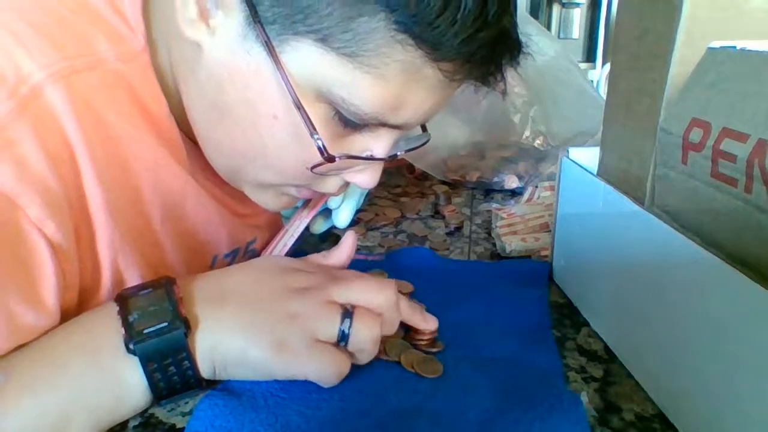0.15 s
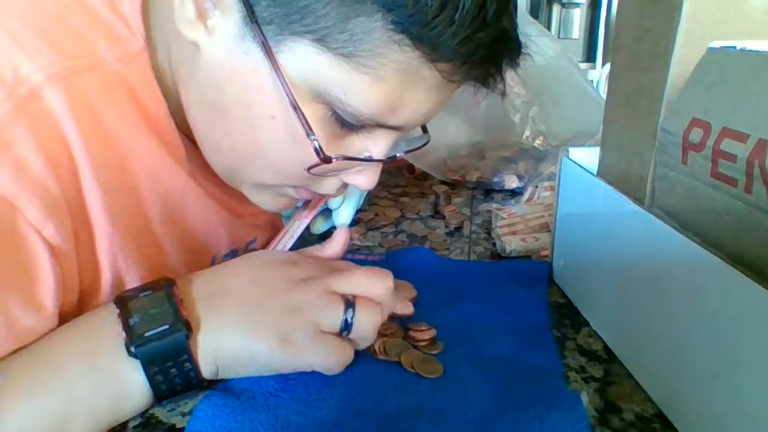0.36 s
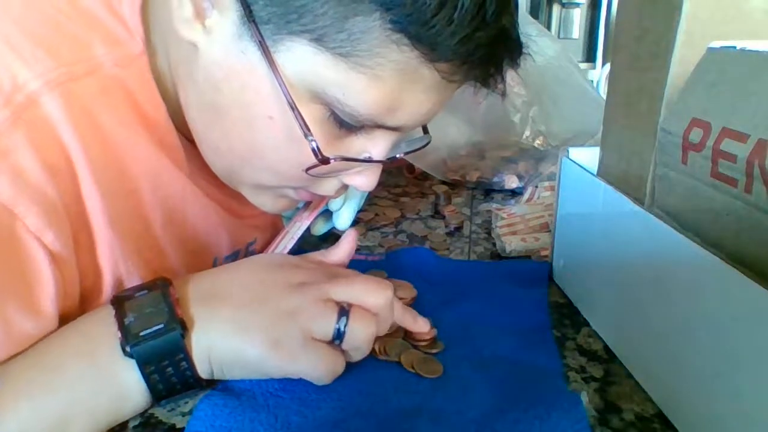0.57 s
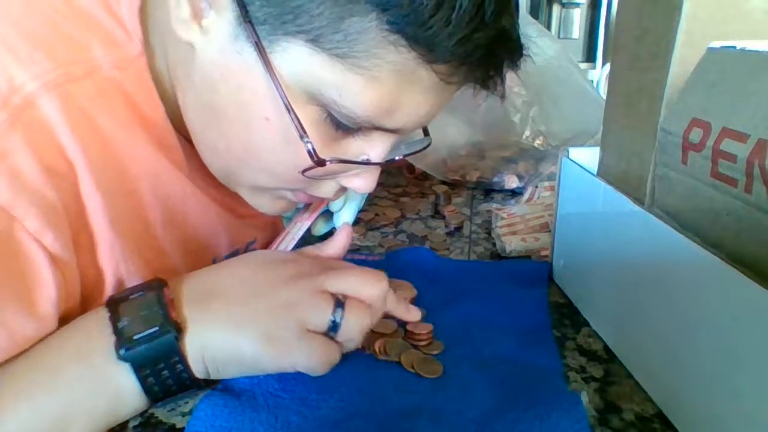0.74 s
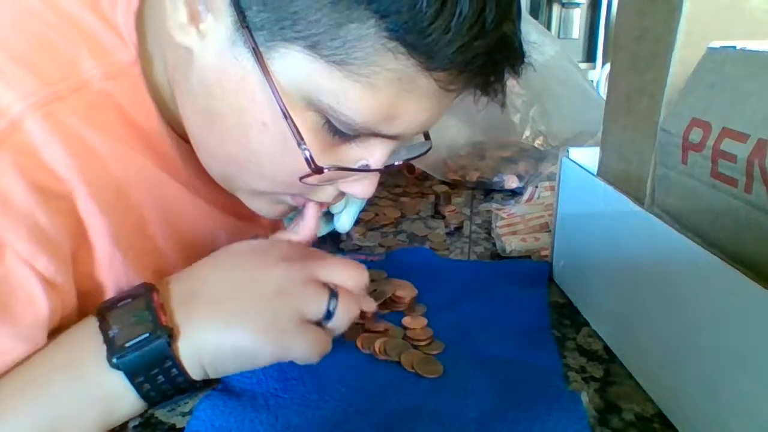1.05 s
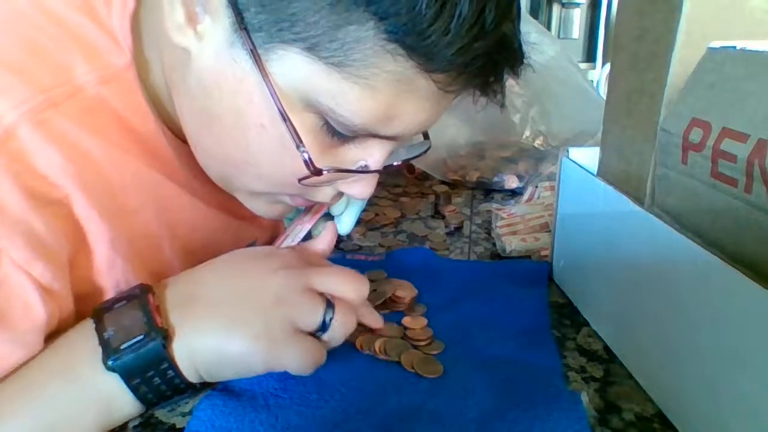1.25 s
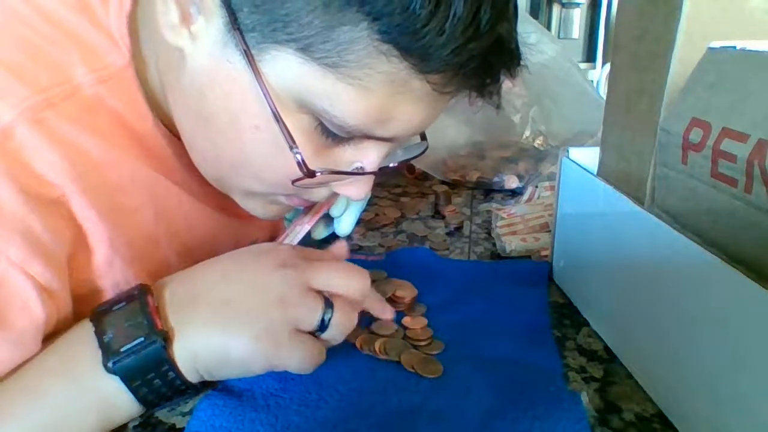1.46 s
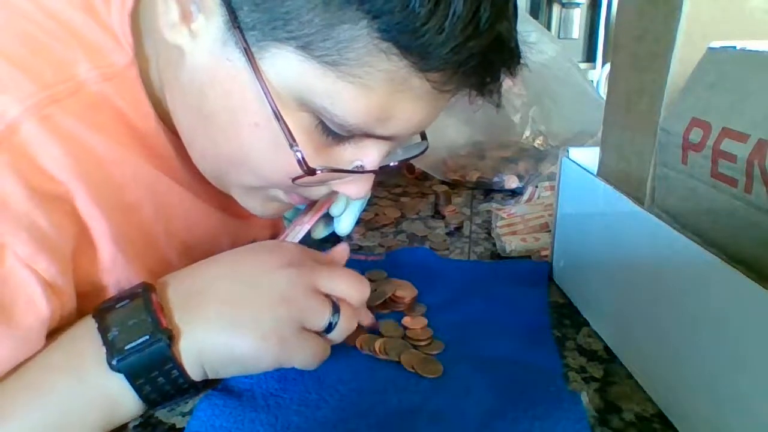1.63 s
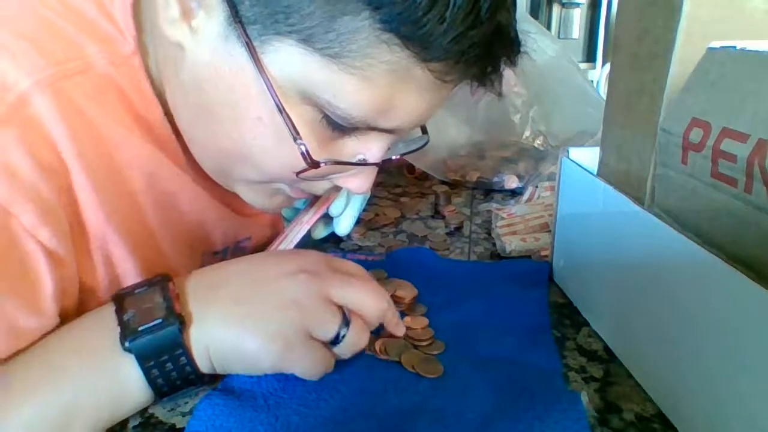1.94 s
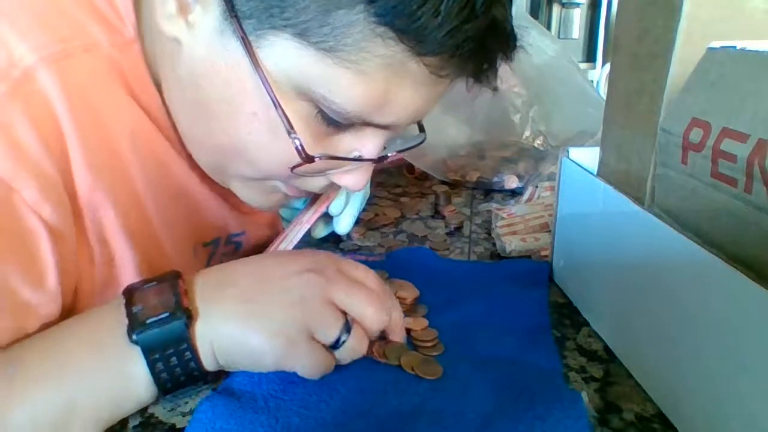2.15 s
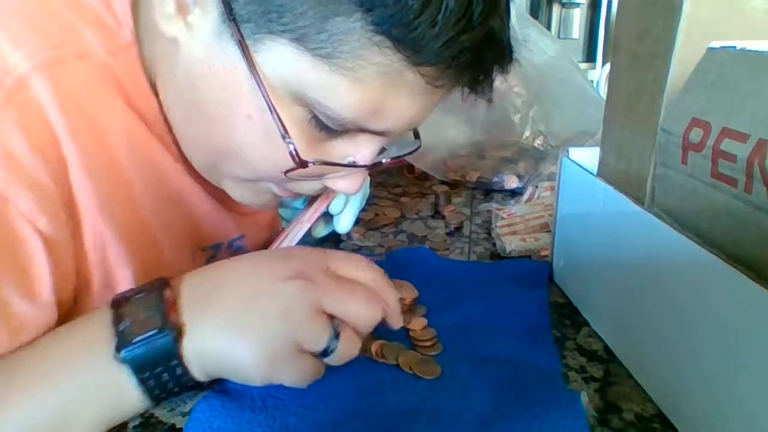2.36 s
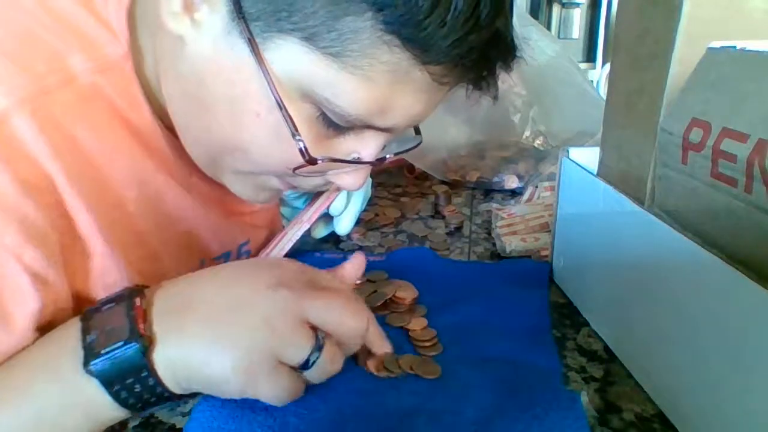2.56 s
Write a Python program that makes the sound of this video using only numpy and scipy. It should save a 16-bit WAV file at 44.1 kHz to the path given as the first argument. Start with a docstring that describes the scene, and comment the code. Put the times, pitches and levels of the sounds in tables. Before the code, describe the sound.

Coins scrape and click together on a soft cloth, then a loud metallic clatter crashes across the room.

```python
"""Coins are pushed about on a cloth close to the microphone: their rims scrape and click together.
The scrapes and clicks are short bursts of noise, filtered to ring like metal; the cloth is soft, patchy noise.
Farther off in the room things are shifted, then clatter down loudly, late on with a metallic clang.
These are noise washes and sine notes that die away as the room rings on, with dull bumps below.
Under it all lie still air and a faint motor hum, and the recorder's limiter flattens the crashes."""
import sys
import numpy as np
from scipy import signal
from scipy.fft import rfft, irfft
from scipy.io import wavfile

SR = 44100
rng = np.random.default_rng(int(sys.argv[2]) if len(sys.argv) > 2 else 0)


def wav_record(signal):
    """Record a signal, one row per channel, as 16-bit PCM in the file named by sys.argv[1]."""
    frames = np.transpose(np.atleast_2d(signal))
    bounded = np.clip(frames, -1, 1)
    # unit amplitude maps onto the largest positive 16-bit level
    quanta = np.round(bounded * 32767).astype(np.int16)
    wavfile.write(sys.argv[1], SR, quanta)


N = 119070
T = np.arange(N) / SR
GRIT_DB, BURST_GRIT_DB = 2.5, 1.5  # unevenness of light contacts, and of heavy clatter


def undb(db):
    """Turn decibels into a plain multiplier."""
    return 10 ** (np.asarray(db) / 20)


def unit(x):
    """Scale to an rms (average strength) of 1."""
    return x / np.sqrt(np.mean(x ** 2))


def add(out, at, x):
    """Mix x into out from a given time in seconds, cutting off what falls outside."""
    i = int(round(at * SR))
    lo, hi = max(i, 0), min(i + len(x), N)
    out[lo:hi] += x[lo - i:hi - i]


def axes(size):
    """Times in seconds and frequencies in Hz of a buffer."""
    return np.arange(size) / SR, np.maximum(np.fft.rfftfreq(size, 1 / SR), 1)


def colour(f, points):
    """Gain at each frequency, drawn in straight lines through (Hz, dB) points on a log pitch axis."""
    hz, db = np.array(points).T
    return undb(np.interp(np.log(f), np.log(hz), db))


def ring(f, hz, width, db):
    """Gain of a resonance standing db above its surroundings."""
    return np.sqrt(1 + (undb(db) ** 2 - 1) / (1 + (2 * (f - hz) / width) ** 2))


def shaped(x, gain):
    """Filter with the given gains, ringing only after each impulse and keeping the power of white noise."""
    cepstrum = irfft(np.log(unit(gain) + 1e-6), len(x))
    # folding the second half onto the first makes the filter respond only forward in time
    cepstrum[1:len(x) // 2] *= 2
    cepstrum[len(x) // 2 + 1:] = 0
    return irfft(rfft(x) * np.exp(rfft(cepstrum)), len(x))


def grit(size, spread_db):
    """Noise like dense tiny impacts, its strength jumping every 16 samples."""
    strength_db = spread_db * np.repeat(rng.standard_normal(size), 16)[:size]
    return unit(rng.standard_normal(size) * undb(strength_db))


def swell(t, rise, hold, t60):
    """Rise, hold, then die away by 60 dB in t60 seconds."""
    fade_db = -60 * np.maximum(t - rise - hold, 0) / t60
    return np.minimum(t / max(rise, 1e-4), 1) * undb(fade_db)


def walk(size, step):
    """Random wandering with a spread near 1, heading for a new value every step samples."""
    knots = rng.standard_normal(int(size / step) + 2)
    return np.interp(np.arange(size) / step, np.arange(len(knots)), knots) * 1.2


# colour of the still room air: pitch_hz, relative_level_db
AIR_COLOUR = [(30, -28), (55, -3), (130, 10), (380, 0.5), (560, -17.5), (1000, -2), (2000, -22),
              (3500, -11), (5500, -6.5), (8600, -47)]
# colour of the motor's throb: pitch_hz, relative_level_db
THROB_COLOUR = [(29, -33.5), (58, 7.5), (87, 7), (116, 4), (145, 4), (174, -13), (230, -16.5), (400, -35)]
AIR_DB = -81.5
MOTOR_HZ, MOTOR_DB, MOTOR_ROUGH_DB = 29.05, -72, 1  # turns per second, level, unevenness of the turns
WHINE_HZ, WHINE_DB, WHINE_WAVER_DB = 780, -80.5, 3


def background():
    """Still room air, and a small motor that throbs once a turn under a wavering whine."""
    _, f = axes(size=N)
    air = undb(AIR_DB) * shaped(rng.standard_normal(N), colour(f, AIR_COLOUR))
    # one click of slightly uneven strength per turn
    turns = np.diff(np.floor(MOTOR_HZ * T), prepend=0) * undb(MOTOR_ROUGH_DB * rng.standard_normal(N))
    throb = undb(MOTOR_DB) * unit(shaped(turns - turns.mean(), colour(f, THROB_COLOUR)))
    whine_level = undb(WHINE_DB + WHINE_WAVER_DB * walk(N, SR / 40))
    whine = whine_level * np.sqrt(2) * np.sin(2 * np.pi * WHINE_HZ * T)
    return throb + whine + air


# dull bumps on the table: start_s, level_db, pitch_hz, decay_s
BUMPS = [(.022, -56.5, 343, 0.024), (0.313, -56.5, 134, .025), (.624, -59.5, 797, 0.018),
         (0.757, -51, 139, 0.0076), (1.446, -50.5, 157, .012), (1.496, -48, 126, .025),
         (1.714, -52, 83, 0.038), (1.757, -52, 580, .02), (1.832, -60.5, 90.6, .08),
         (1.941, -29.5, 111.4, .028), (1.988, -39.5, 84.3, .07), (2.163, -41.5, 118.6, .03),
         (2.3, -49, 81, .08), (2.387, -38, 109, .02), (2.403, -27.5, 123, .025), (2.44, -34, 448.8, 0.05),
         (2.475, -29, 339, 0.0093), (2.582, -48, 188, 0.017), (2.667, -44.5, 263, 0.036),
         (2.632, -48.5, 100, .04)]
THUMP_RISE_S, THUMP_NOISE = .004, 0.63  # noise strength beside a note of peak 1


def thumps():
    """Each bump sets off a damped note with rumble around it."""
    out = np.zeros(N)
    t, f = axes(size=16384)
    for at, db, hz, decay in BUMPS:
        rumble = shaped(rng.standard_normal(len(t)), 1 / (1 + np.log2(f / hz) ** 4) ** 2)
        bump = np.sin(2 * np.pi * hz * t) + THUMP_NOISE * rumble
        envelope = np.minimum(t / THUMP_RISE_S, 1) * np.exp(-t / decay)
        add(out, at, undb(db) * bump * envelope)
    return out


# lighter clinks across the room: start_s, level_db, rise_s, hold_s, ring_hz, ring_width_hz, ring_db
CLINK_EVENTS = [(1.431, -47, 0.0025, 0.05, 3600, 350, 9), (1.485, -54.5, .005, 0.031, 3500, 500, 9),
                (2.657, -54, .003, 0.011, 5045, 200, 23)]
# colour of the clinks: pitch_hz, relative_level_db
CLINK_COLOUR = [(100, -16), (1000, -26), (1700, 0.5), (2500, -2.5), (3200, 6.5), (4200, 3), (5400, 6),
                (5900, -11), (7200, -5.5), (8600, -26)]
CLINK_T60_S = 0.12


def clinks():
    """Small hard things touch: gritty noise through one strong ring each."""
    out = np.zeros(N)
    t, f = axes(size=32768)
    for at, db, rise, hold, hz, width, ring_db in CLINK_EVENTS:
        gain = colour(f, CLINK_COLOUR) * ring(f, hz, width, ring_db)
        rattle = shaped(grit(len(t), GRIT_DB), gain)
        add(out, at, undb(db) * rattle * swell(t, rise, hold, CLINK_T60_S))
    return out


# touches of a small piece that chimes near the end: start_s, level_db
CHIME_TOUCHES = [(2.629, -37.5), (2.673, -46)]
CHIME_HZ, CHIME_RISE_S, CHIME_T60_S = 3426, 0.0051, .16


def chimes():
    """One clear sine note, touched twice and dying away."""
    out = np.zeros(N)
    t, _ = axes(size=16384)
    note = np.sqrt(2) * np.sin(2 * np.pi * CHIME_HZ * t) * swell(t, CHIME_RISE_S, 0, CHIME_T60_S)
    for at, db in CHIME_TOUCHES:
        add(out, at, undb(db) * note)
    return out


# blows on a metal object: start_s, level_db, rise_s, hold_s
METAL_BLOWS = [(2.401, -18, 0.0011, 0.033), (2.453, -24, 0.0014, 0.045), (2.634, -40.5, 0.0027, 0.0083)]
# resonances of the metal object: pitch_hz, width_hz, strength_db
METAL_MODES = [(1226, 13, 16.5), (2743, 51, 15.5), (2800, 150, 13), (3520, 210, 10), (3810, 69, 8.5),
               (4190, 98, 5.5), (4450, 70, 9), (5000, 44, 7), (5070, 30, 7), (5330, 23, 3), (5340, 80, 10),
               (5990, 75, 10), (7250, 170, 14)]
# broad colour of the metal object: pitch_hz, relative_level_db
METAL_COLOUR = [(60, -5), (150, 0), (400, -3), (800, -5.5), (1500, -4), (2350, -1), (2750, 1), (3150, -0.5),
                (4000, 4), (5300, 8), (6200, 5), (6800, -3), (7600, -17.5), (8600, -12.5)]
CLANG_T60_S, PARTIAL_T60_S = 0.44, 0.43  # die-away of the rattle, and of the singing notes
SING_DB = -8  # singing notes against the rattle
DETUNE_HZ, PARTIAL_WAVER_DB, WAVERS_PER_S = 13.6, 8, 39


def metal_partial(t, hz, mode_db):
    """One singing note of the metal, slightly detuned and wavering in level."""
    level = undb(mode_db + PARTIAL_WAVER_DB * walk(len(t), SR / WAVERS_PER_S)) * colour(hz, METAL_COLOUR)
    detuned_hz = hz + DETUNE_HZ * rng.uniform(-1.1, 1)
    return level * np.sin(2 * np.pi * (detuned_hz * t + rng.random()))


def clangs():
    """A metal object lands and rattles; each blow drives the same resonances, which sing on in pairs."""
    out = np.zeros(N)
    t, f = axes(size=32768)
    metal = colour(f, METAL_COLOUR) * np.max([ring(f, *mode) for mode in METAL_MODES], axis=0)
    for at, db, rise, hold in METAL_BLOWS:
        rattle = shaped(grit(len(t), BURST_GRIT_DB), metal) * swell(t, rise, hold, CLANG_T60_S)
        partials = sum(metal_partial(t, hz, mode_db) for hz, _, mode_db in METAL_MODES for _ in range(2))
        singing = undb(SING_DB) * unit(partials) * swell(t, rise, hold, PARTIAL_T60_S)
        add(out, at, undb(db) * (rattle + singing))
    return out


# things shifted and dropped across the room: start_s, level_db, rise_s, hold_s, treble_boost_db, t60_s
KNOCK_EVENTS = [(1.473, -49, 0.021, 0.012, -4.5, 0.31), (1.664, -52, 0.023, 0.033, -4.5, 0.32),
                (1.759, -63, 0.044, .07, -6, 0.4), (1.855, -46.5, 0.045, 0.12, -5.5, 0.51),
                (1.938, -42, 0.02, 0.049, 10.5, 0.47), (1.986, -30, 0.011, 0.063, 3.5, 0.36),
                (2.155, -20, 0.015, 0.047, 7, 0.4), (2.24, -21.5, 0.0089, 0.015, 8, 0.4),
                (2.341, -42, 0.0052, 0.014, -2, 0.27), (2.451, -24.5, .004, 0.007, 19.5, 0.36),
                (2.615, -40.5, .015, 0.024, -20, 0.34)]
# colour of the knocks: pitch_hz, relative_level_db
KNOCK_COLOUR = [(60, -32), (150, -11.5), (420, -15.5), (630, -5), (780, -6), (1030, 0.5), (1300, -2),
                (1550, -3.5), (1970, -1.5), (2250, -7), (3200, -8), (3950, -8.5), (4700, -12.5), (5300, -9),
                (5650, -14.5), (6100, -13), (6600, -17), (7300, -28.5), (8600, -39)]
# resonances of what is knocked: pitch_hz, width_hz, strength_db
KNOCK_RINGS = [(640, 14, 6), (927, 15, 2.5), (1065, 4.7, 4.5), (1044, 6.4, 6.5), (1243, 8.3, 9),
               (1277, 53, 6), (1410, 25, 2), (1740, 60, 1.5), (1812, 20, -3.5), (1950, 9.2, 7.5),
               (3320, 28, 5), (3590, 12, -3.5), (3920, 100, 5), (4230, 30, 7)]
TREBLE_HZ, TREBLE_T60_SHARE = 2620, 0.94  # where treble begins, and its share of the die-away time
GRAIN_DB, GRAINS_PER_S = 1, 151  # fine flutter of the wash


def knocks():
    """Distant clatter, smeared into a dense wash by the room, where the treble dies first."""
    out = np.zeros(N)
    t, f = axes(size=32768)
    treble = 1 / (1 + (TREBLE_HZ / f) ** 4)
    struck = colour(f, KNOCK_COLOUR) * np.max([ring(f, *mode) for mode in KNOCK_RINGS], axis=0)
    for at, db, rise, hold, treble_db, t60 in KNOCK_EVENTS:
        wash = undb(db) * shaped(grit(len(t), BURST_GRIT_DB), struck * undb(treble_db * treble))
        wash = wash * undb(GRAIN_DB * walk(len(t), SR / GRAINS_PER_S))
        high = irfft(rfft(wash) * treble)
        low = wash - high
        add(out, at, low * swell(t, rise, hold, t60))
        add(out, at, high * swell(t, rise, hold, t60 * TREBLE_T60_SHARE))
    return out


# the hand rubbing over the cloth: time_s, level_db (before the floor and trim below)
RUB_LEVELS = [(0.0, -60.5), (0.03, -65), (0.082, -65.5), (0.242, -68.5), (0.308, -56.5), (0.586, -89),
              (0.658, -61.5), (0.906, -68), (0.958, -89), (1.01, -63.5), (1.252, -81), (1.288, -58),
              (1.458, -63.5), (1.494, -55), (1.622, -72.5), (1.694, -70.5), (1.838, -62.5), (1.85, -67)]
# colour of the cloth: pitch_hz, relative_level_db
CLOTH_COLOUR = [(40, -27.5), (120, 0.5), (250, 4.5), (380, 2.5), (540, -11), (800, -4.5), (1150, -12.5),
                (1700, -15.5), (3000, -19), (8000, -54.5)]
RUB_FLOOR_DB, RUB_TRIM_DB = -78.5, -2.5
RUB_PATCHY_DB, RUB_PATCHES_PER_S = 3.5, 40


def cloth():
    """Soft rubbing noise that comes and goes with the hand, each octave in patches of its own."""
    _, f = axes(size=N)
    at, db = np.array(RUB_LEVELS).T
    rub = rfft(shaped(rng.standard_normal(N), colour(f, CLOTH_COLOUR)))
    patchy = np.zeros(N)
    for octave in range(5, 14):  # overlapping bands centred on 2 ** octave Hz
        band = np.maximum(1 - abs(np.log2(f) - octave), 0)
        patches = undb(RUB_PATCHY_DB * walk(N, SR / RUB_PATCHES_PER_S))
        patchy += irfft(rub * band, N) * patches
    level_db = np.interp(T, at, np.maximum(db, RUB_FLOOR_DB)) + RUB_TRIM_DB
    return undb(level_db) * unit(patchy)


# colour of a coin contact: pitch_hz, relative_level_db
COIN_COLOUR = [(100, -13), (900, -33.5), (1700, -25.5), (2300, -15.5), (2900, -4.5), (4300, -1.5),
               (5300, 6.5), (6300, 5), (7400, -2.5), (8600, -13)]
FINE_DB, FINE_HZ = 3, 159.5  # random unevenness of that colour, and its spacing in pitch


def coin_contact(f):
    """Each contact rings in its own way: the coin colour with fresh random bumps."""
    bumps = np.interp(f / FINE_HZ, np.arange(len(f)), rng.standard_normal(len(f)))
    return colour(f, COIN_COLOUR) * undb(FINE_DB * bumps)


# coins sliding over one another: middle_s, half_length_s, level_db, ring_hz, ring_db, body_db
COIN_SLIDES = [(.000, 0.01, -52, 6540, 7, -5), (0.017, 0.021, -62.5, 6200, 11, -3),
               (0.236, 0.0046, -34, 3370, 16.5, 0.5), (0.241, 0.018, -54, 4600, -8, 3),
               (0.297, .005, -56, 6240, 17, -9), (0.314, 0.0056, -55.5, 5400, 0, 11),
               (0.341, 0.014, -43.5, 5400, -11, -8), (0.366, 0.015, -43, 5460, -8, -7),
               (0.409, 0.0098, -57, 6060, 12, 7), (0.627, 0.0042, -44, 5450, 9.5, -6),
               (0.636, 0.019, -59.5, 6200, -21, -2), (.684, 0.006, -41, 5200, 27, 10.5),
               (0.703, .01, -37.5, 3360, 12.5, 2.5), (.72, 0.0034, -33.5, 6140, 7, 5.5),
               (0.74, 0.01, -62, 3030, -3, 18), (0.932, 0.01, -56.5, 5500, 0, 8),
               (0.993, 0.025, -60.5, 6250, 7, 2), (1.008, 0.0082, -44.5, 5050, 13.5, 6.5),
               (1.05, 0.021, -55.5, 5970, 3, 5.5), (1.27, 0.0086, -42, 4920, 16, 0),
               (1.277, 0.008, -38, 4160, 18.5, -5), (1.295, 0.027, -59, 2370, 41, 3),
               (1.345, 0.0018, -38, 6500, 15, -2), (1.349, 0.0017, -31, 5020, 6, -2.5),
               (1.358, .005, -49, 5620, -17, 1), (1.367, 0.0032, -44.5, 6200, -9, -4),
               (1.706, 0.0066, -40.5, 7130, 14.5, -45), (1.717, 0.014, -51, 5110, 33, -15),
               (1.842, 0.025, -59, 5180, 23, 22)]
# single rim clicks: start_s, level_db, body_db
RIM_CLICKS = [(.056, -54, 7), (.111, -64.5, 14), (.288, -39, -25), (.3265, -32, -6), (.3325, -44, -9),
              (.3575, -55, -22), (.3905, -34, 4), (0.682, -40, 7), (.698, -43, 13), (.7085, -52, -21),
              (.749, -47, 2), (0.783, -52, 10.5), (.926, -50, 9), (0.972, -52, -5), (.9865, -45, -9),
              (1, -41, 2), (1.0375, -41.5, 8), (1.0445, -54, -1), (1.108, -66, 7), (1.161, -91, -5),
              (1.174, -69, -8), (1.477, -33, -10), (1.629, -55, -13), (1.637, -56, 5), (1.67, -51.5, 7),
              (1.684, -41.5, -13), (1.786, -53, 10), (1.829, -41.5, 6)]
BODY_HZ, BODY_OCTAVES, RING_WIDTH_HZ = 2780, 0.52, 150  # body is a broad hump, ring a narrow peak
CLICK_S = 0.00059  # decay of the push behind a click
COIN_ROOM_DB, COIN_T60_S = -11.5, 0.17


def coins():
    """Rims scrape in short gritty runs or click once, damped by the cloth, with a short room echo."""
    out = np.zeros(N)
    t, f = axes(size=8192)
    middle = t[len(t) // 2]
    body = np.exp(-(np.log2(f / BODY_HZ) / BODY_OCTAVES) ** 2)
    for at, half, db, hz, ring_db, body_db in COIN_SLIDES:
        push = grit(len(t), GRIT_DB) * np.exp(-((t - middle) / half) ** 2)
        gain = coin_contact(f) * ring(f, hz, RING_WIDTH_HZ, ring_db) * undb(body_db * body)
        add(out, at - middle, undb(db) * shaped(push, gain))
    for at, db, body_db in RIM_CLICKS:
        push = grit(len(t), 0) * (t >= middle) * np.exp(-abs(t - middle) / CLICK_S)
        gain = coin_contact(f) * undb(body_db * body)
        add(out, at - middle, undb(db) * shaped(push, gain))
    room = rng.standard_normal(SR // 2) * undb(-60 * T[:SR // 2] / COIN_T60_S)
    echo = signal.fftconvolve(out, room / np.linalg.norm(room))[:N]
    return out + undb(COIN_ROOM_DB) * echo


def scene():
    """Room tone, clatter farther off, then cloth and coins nearby."""
    far = background() + thumps() + clinks() + chimes() + clangs() + knocks()
    near = cloth() + coins()
    return (far + near)[None]


LIMIT_DB, LIMIT_RATIO, LIMIT_S = -24.5, 4, 0.0033  # threshold, dB in per dB out, reaction time
TOP_HZ, LEAK_HZ, LEAK_DB = 7700, 8900, -9.5  # band edge, upper end of the leak, level of the leak


def low_pass(x, hz):
    """Steep filter that keeps what lies below hz, run both ways so nothing is delayed."""
    sos = signal.ellip(8, .1, 50, hz, fs=SR, output="sos")
    return signal.sosfiltfilt(sos, x, padtype="even")


def record(dry):
    """A fast limiter holds the crashes down; the narrow-band recorder lets little through above its edge."""
    keep = np.exp(-1 / (LIMIT_S * SR))
    level = np.sqrt(signal.lfilter([1 - keep], [1, -keep], dry ** 2))
    excess = np.maximum(level / undb(LIMIT_DB), 1)
    limited = dry * excess ** (1 / LIMIT_RATIO - 1)
    band = low_pass(limited, TOP_HZ)
    leak = undb(LEAK_DB) * (limited - band)
    return low_pass(band + leak, LEAK_HZ)


dry = scene()
out = record(dry)
wav_record(out)
```